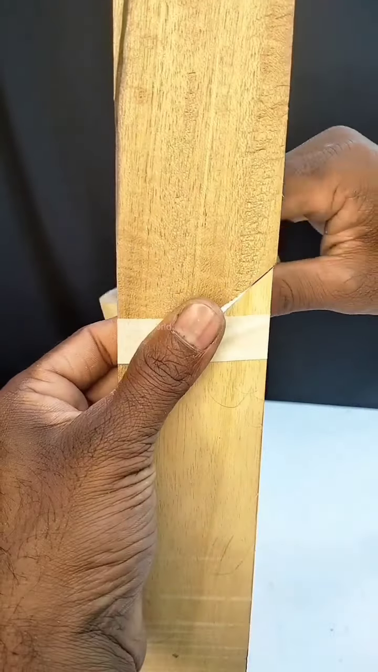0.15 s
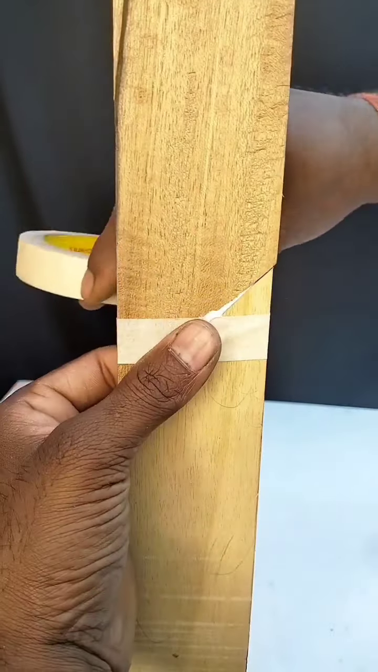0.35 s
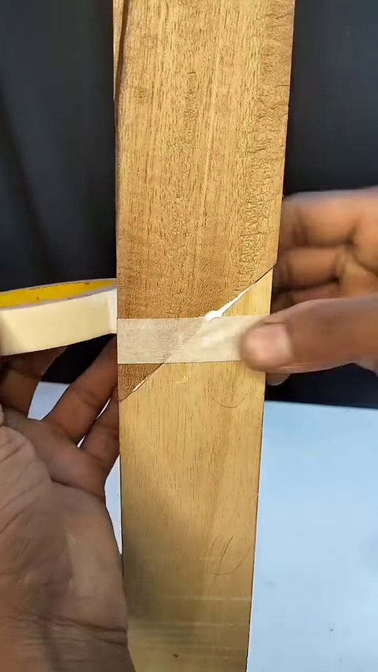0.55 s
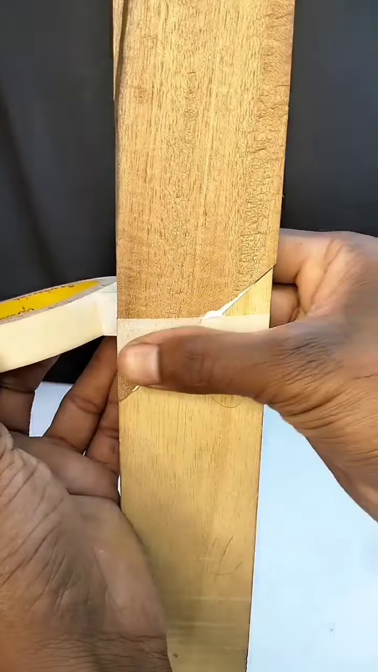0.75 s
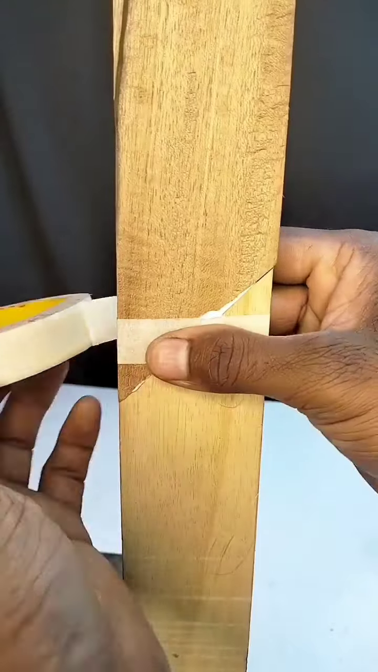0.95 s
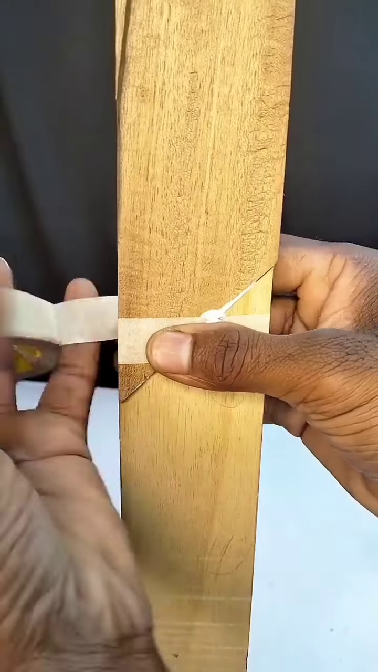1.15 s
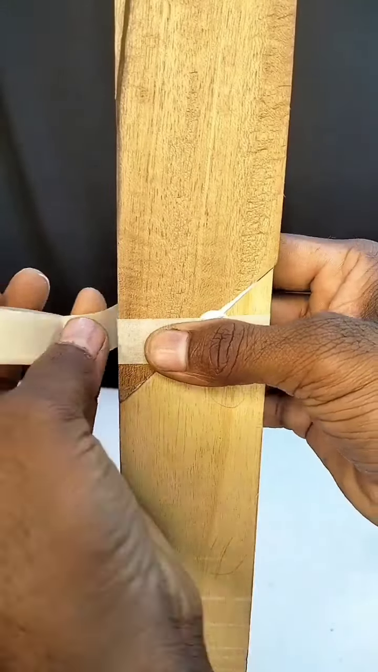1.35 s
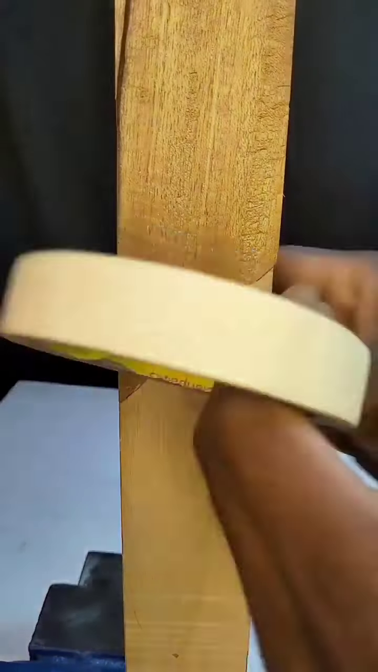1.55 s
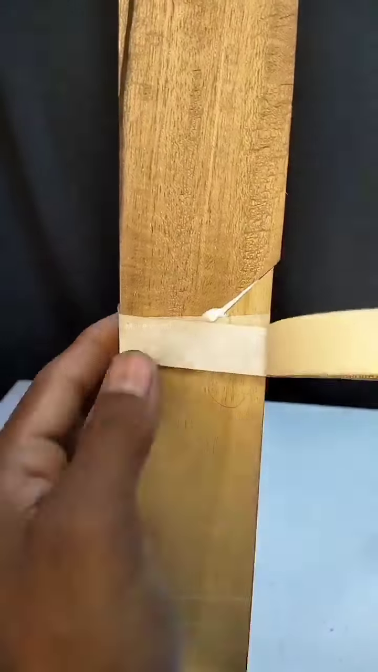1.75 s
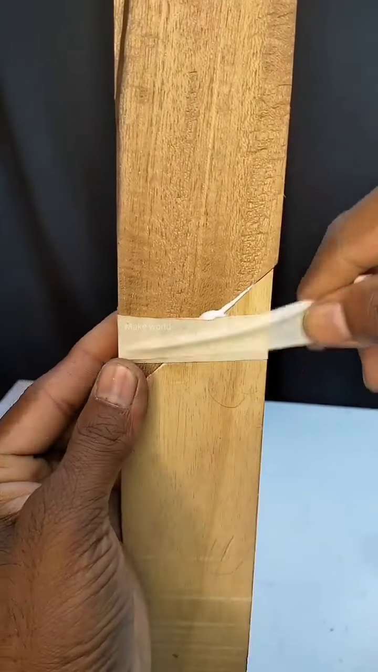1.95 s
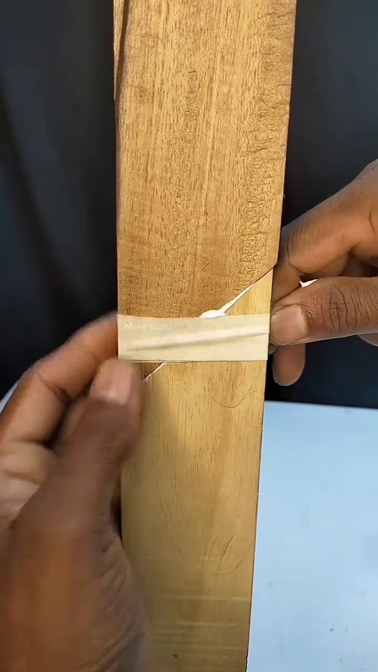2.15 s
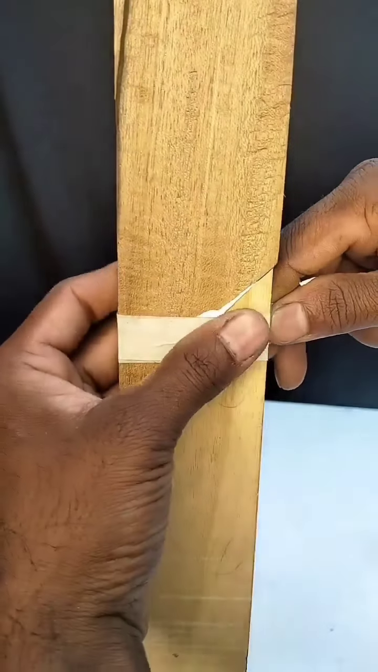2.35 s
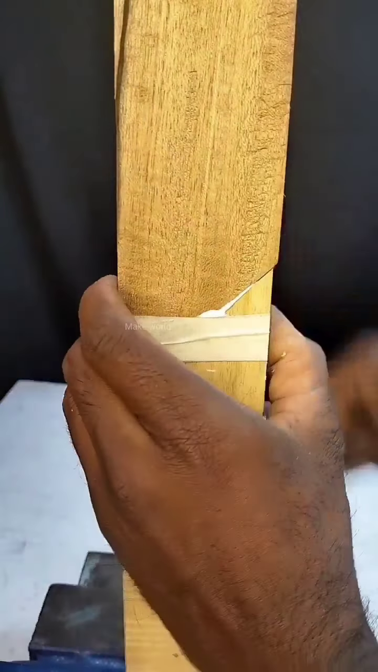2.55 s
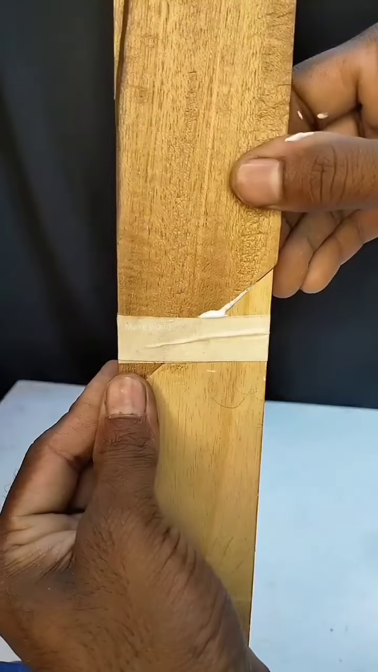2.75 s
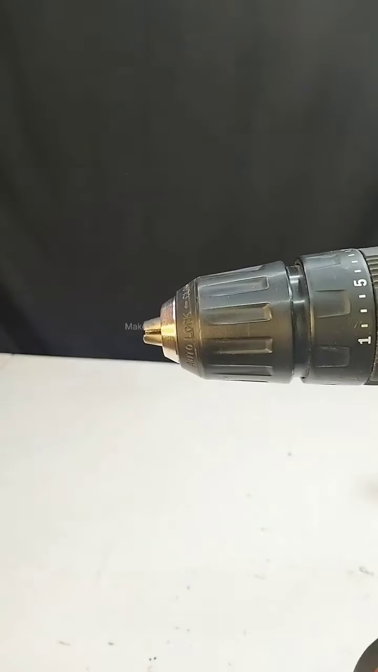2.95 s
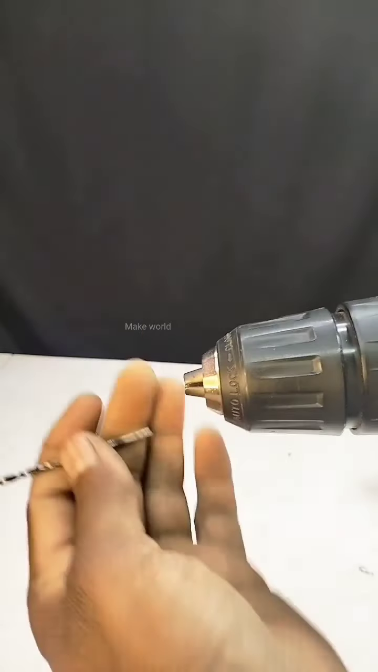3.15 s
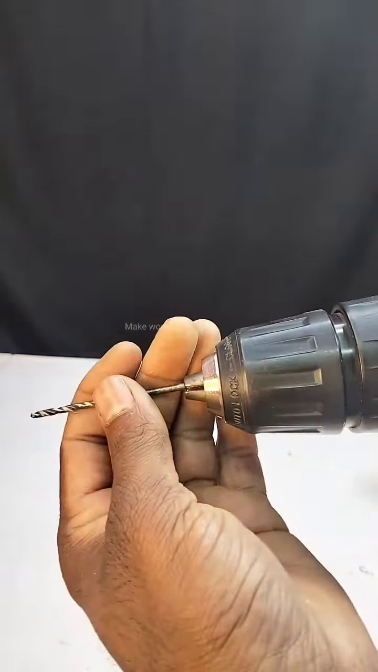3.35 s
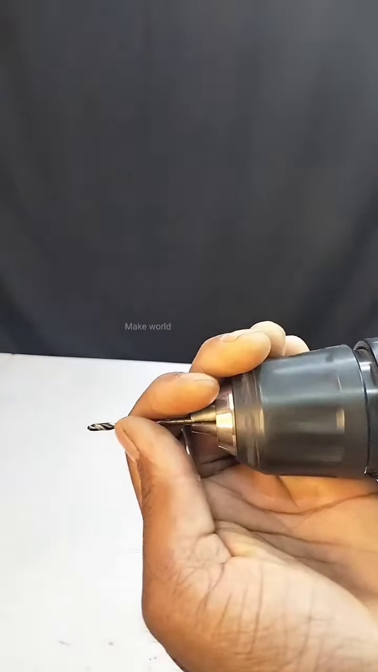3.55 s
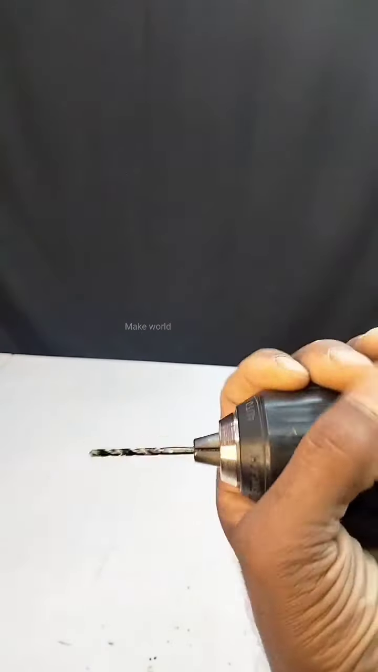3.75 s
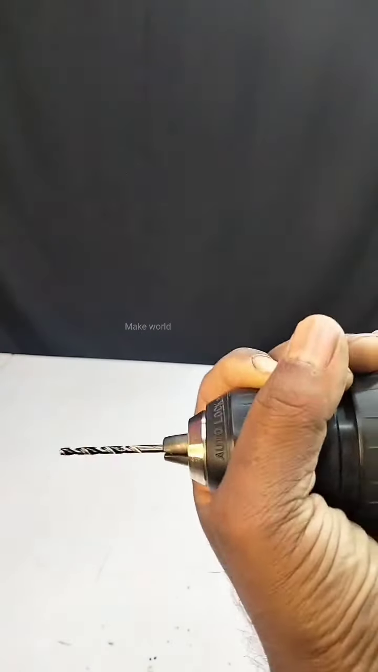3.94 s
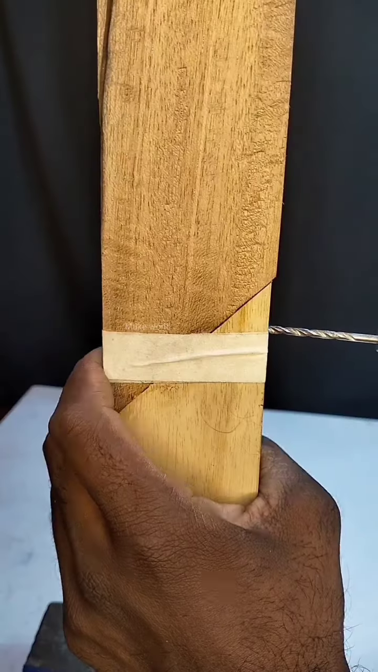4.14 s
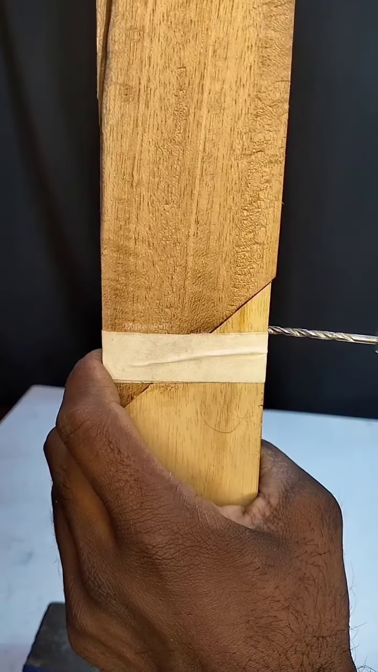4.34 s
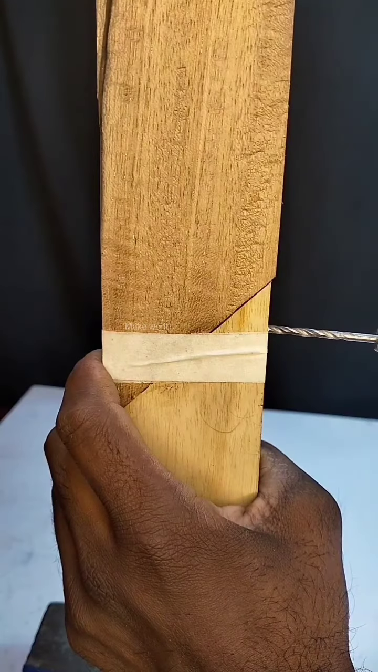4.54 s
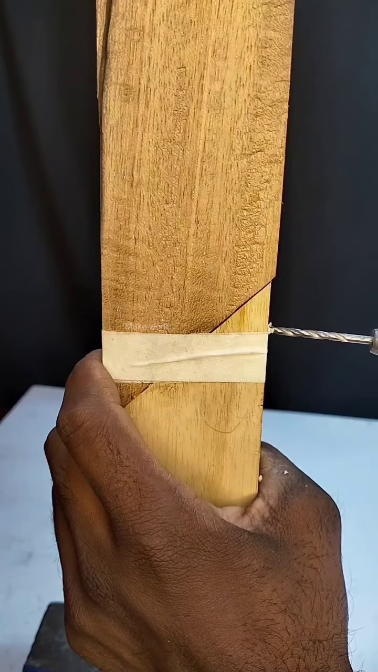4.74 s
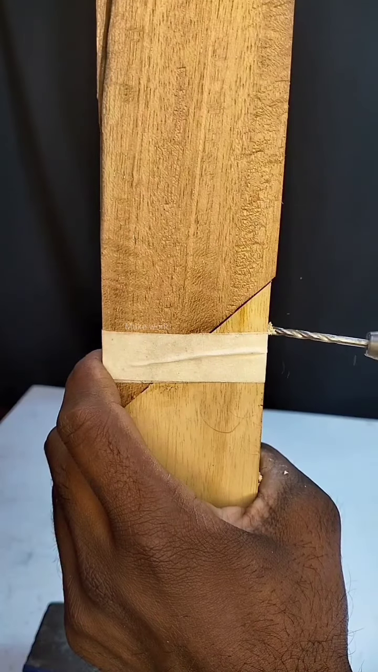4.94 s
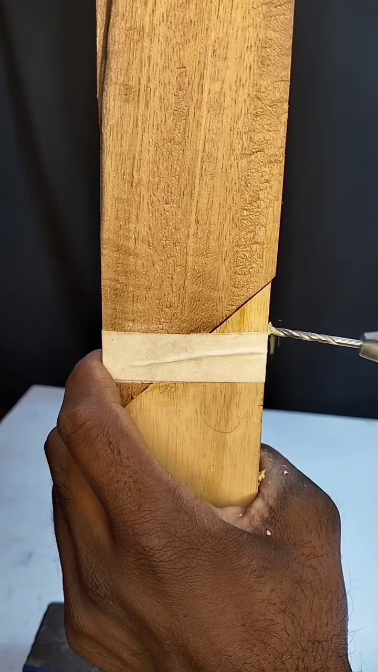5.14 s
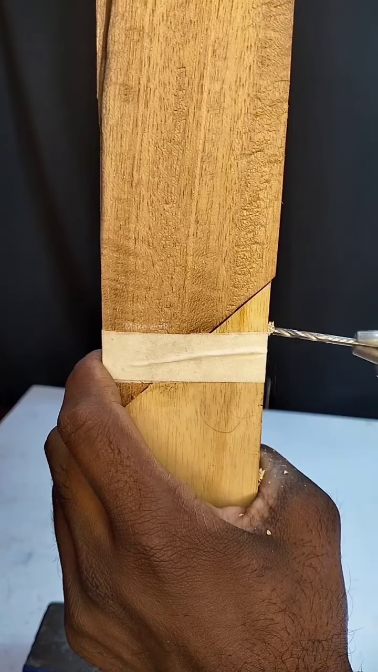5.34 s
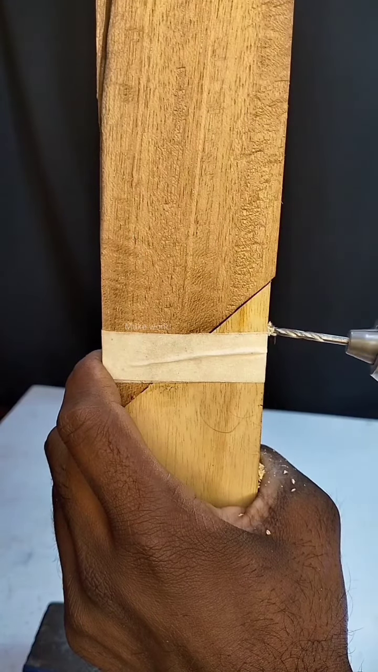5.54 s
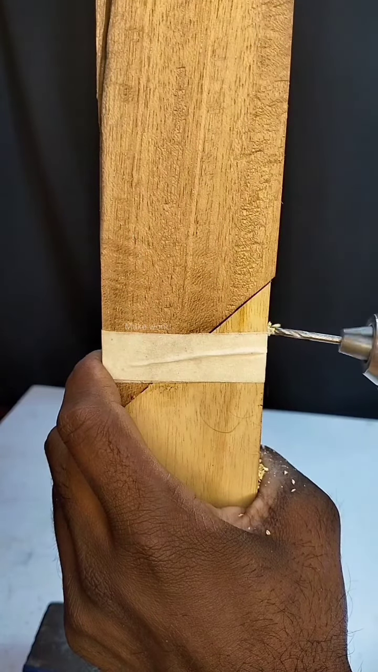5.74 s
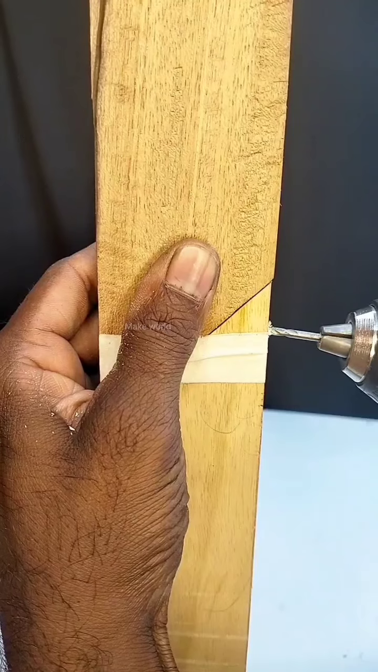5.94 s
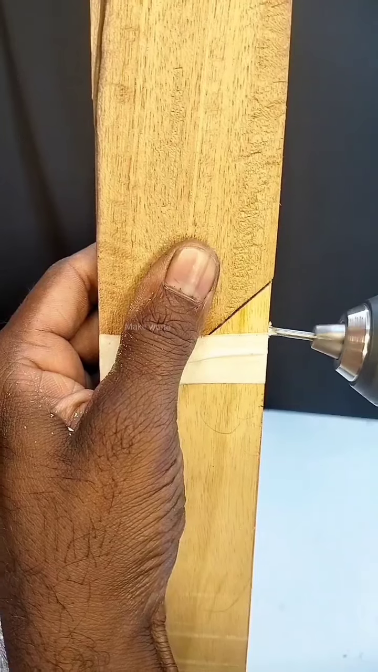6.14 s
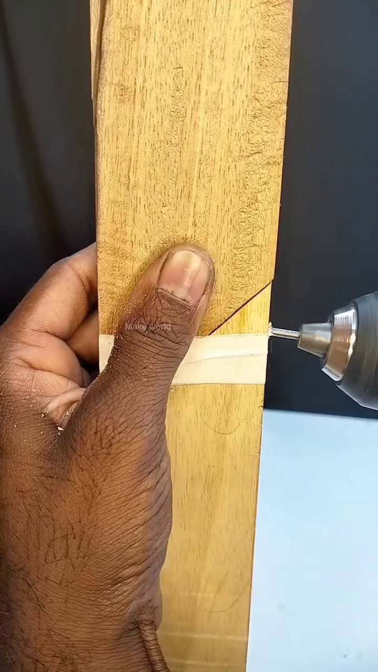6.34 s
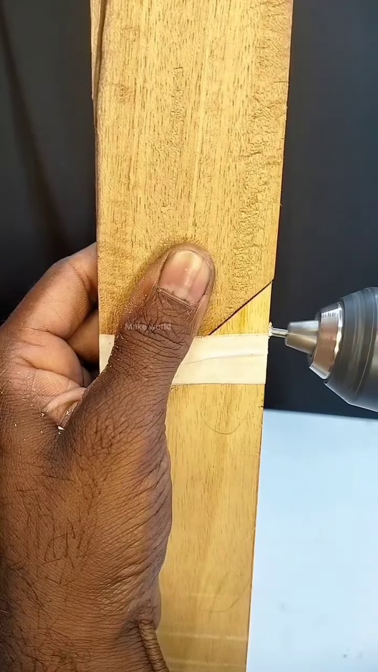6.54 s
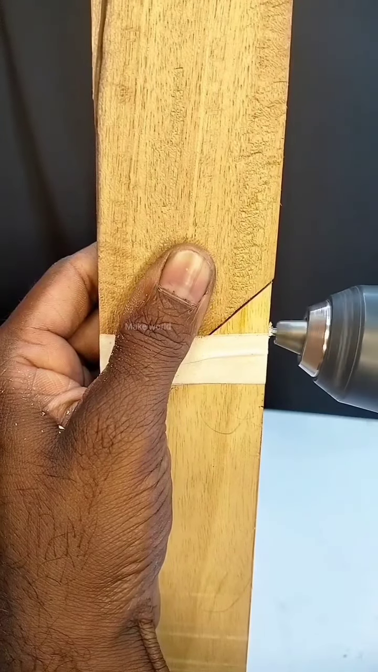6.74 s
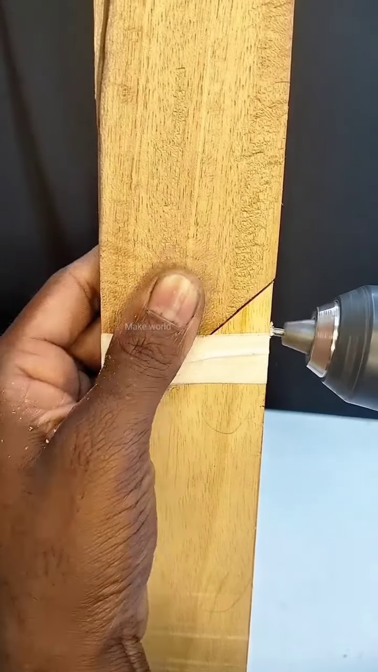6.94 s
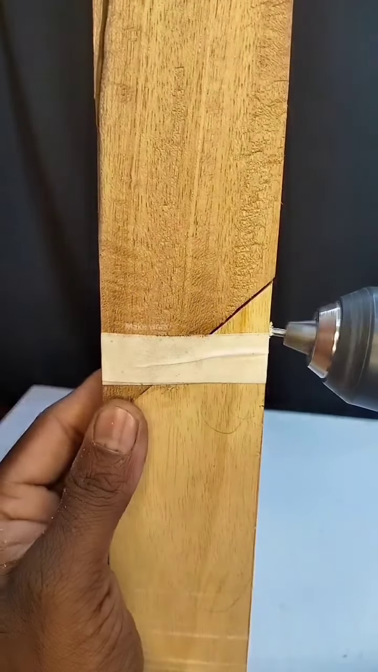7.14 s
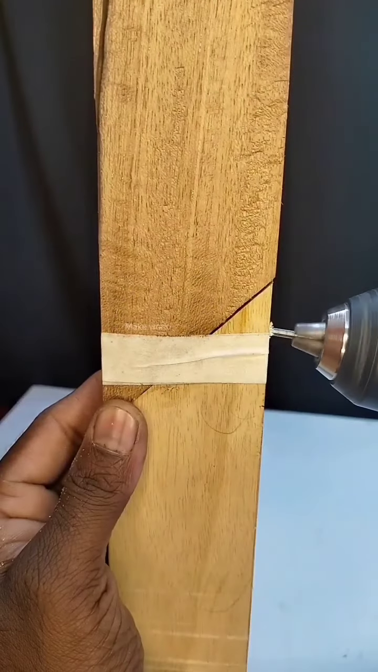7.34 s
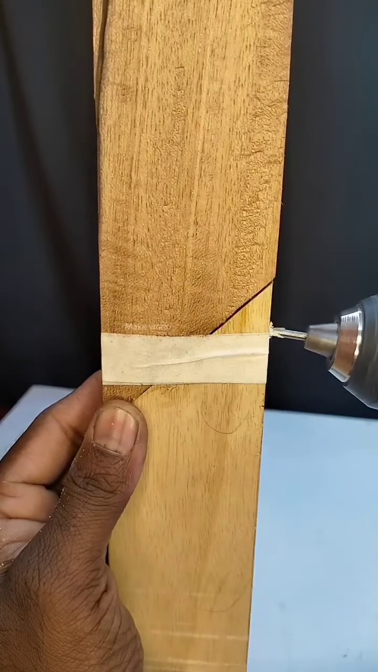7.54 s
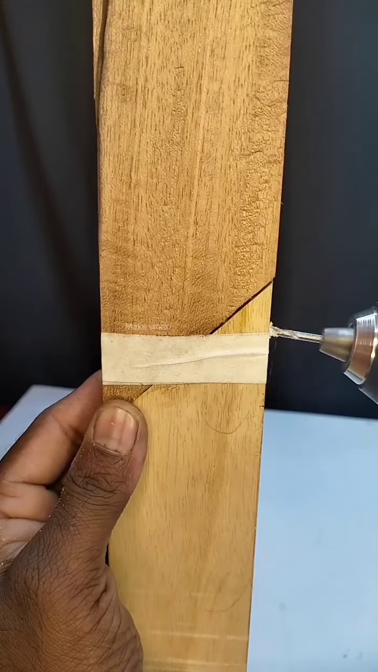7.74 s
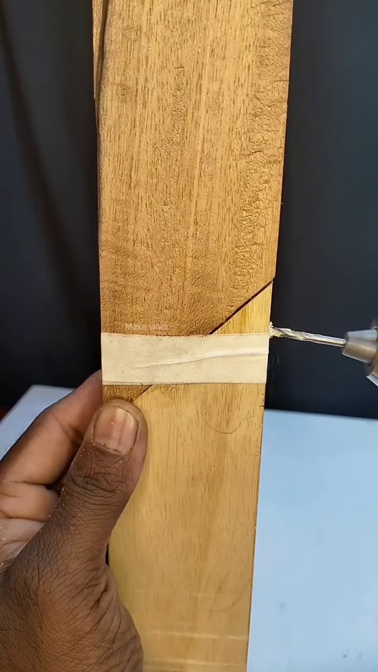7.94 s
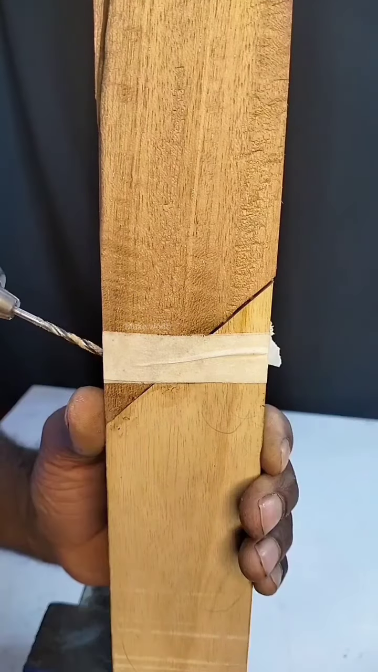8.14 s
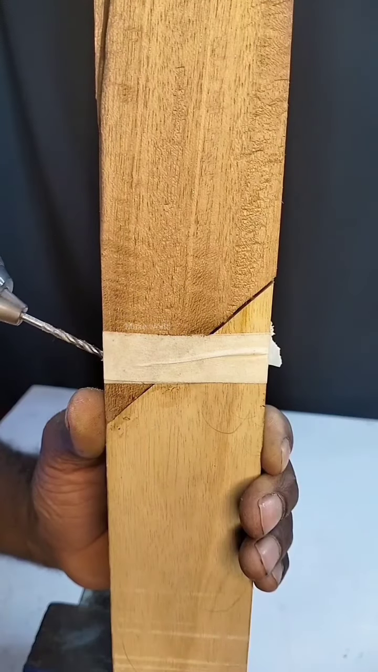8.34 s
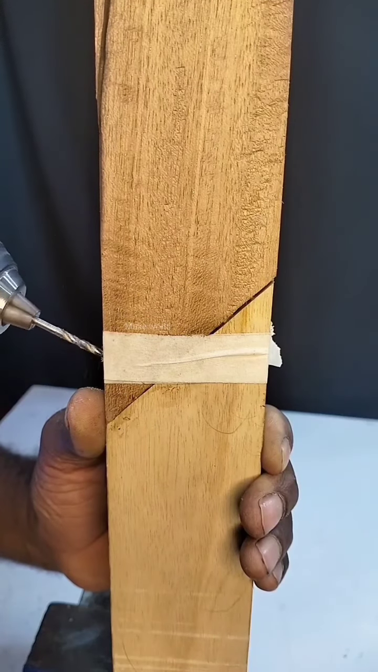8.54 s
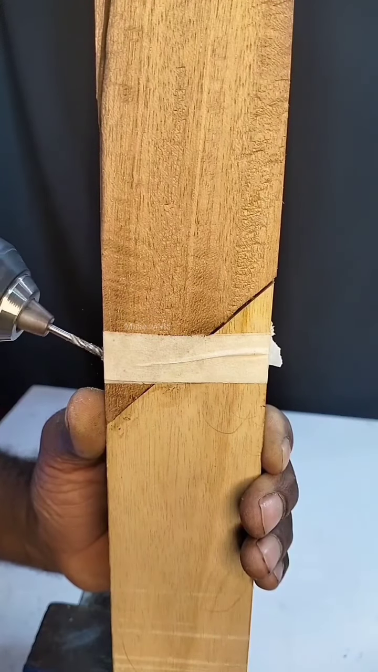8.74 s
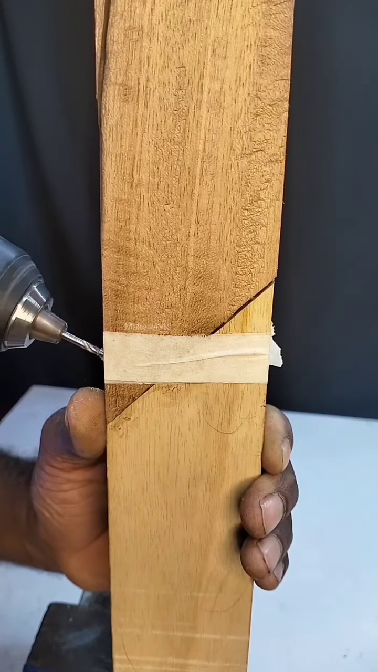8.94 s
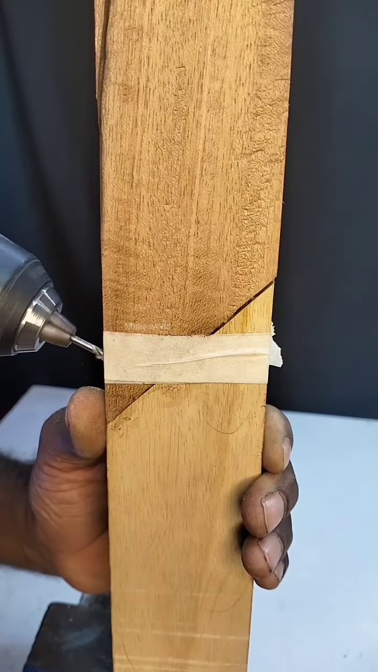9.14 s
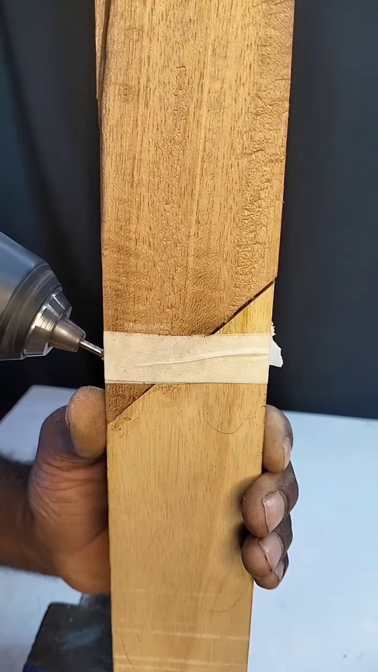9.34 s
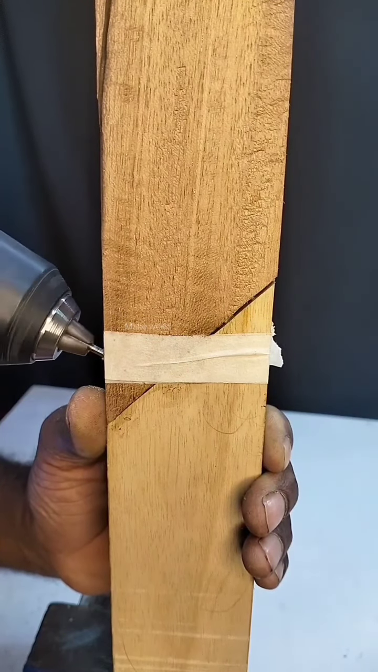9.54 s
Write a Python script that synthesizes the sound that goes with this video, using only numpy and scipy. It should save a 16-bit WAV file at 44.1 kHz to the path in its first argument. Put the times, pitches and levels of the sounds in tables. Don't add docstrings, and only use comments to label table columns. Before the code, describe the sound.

Quiet taping with a knock and a rip, steel clacks of a drill chuck tightening, then three close bursts of cordless drilling into a plank.

```python
import sys
import numpy as np
from scipy import signal
from scipy.io import wavfile
from scipy.ndimage import uniform_filter1d, minimum_filter1d

SR = 44100
rng = np.random.default_rng(int(sys.argv[2]) if len(sys.argv) > 2 else 0)


def to_wav(s):
    ch = np.atleast_2d(s).T
    pcm = np.round(np.clip(ch, -1, 1) * 32767)
    wavfile.write(sys.argv[1], SR, pcm.astype(np.int16))


def invert_db(x):
    u = np.asarray(x, float) / 20
    return 10 ** u


N = 422919
EDGE_HZ = 15550

# three of handwork, then three drill runs [s].
SHOT_EDGES = [0, 3.05, 3.572, 4.24, 5.935, 8.187, 9.6]
# frequency in Hz, left minus right in dB.
LEAN = [
    [(60, 2), (240, 2), (950, 2), (3770, -3), (15000, 0)],
    [(60, 6), (240, -1), (950, 1.5), (3770, -5.5), (15000, 2)],
    [(60, -3), (240, 3), (950, 1), (3770, -1), (15000, 1.5)],
    [(60, -7), (240, 12), (950, -2), (3770, 0.5), (15000, 2)],
]
# multiple of shaft speed, level in dB above gear noise.
HALF_SPEED = [(10, -8), (20, -12), (30, -4), (42, -11)]
LIGHT_CUT = [(10, -13), (14, -19), (20, -15.5), (23.3, -26), (30, -4), (40, -13)]
BITING = [(1.45, -20), (2, -13), (10, -13), (16, -17)]
DEEP_CUT = [(1.45, -19.5), (2, -24), (4, -14.5), (8, -17.5), (10, -12.5), (18, -17)]
BINDING = [(2, -19.5), (4, -13), (16, -17), (18, -18), (20, -8.5), (28, -12)]
BOTTOMED = [(2, -10), (3, -25.5), (4, -13.5), (10, -20), (14, -18.5), (20, -8.5), (22, -13.5)]
BRAKING = [(2, -19), (4, -13), (10, -20), (20, -16), (30, -9)]
SKATING = [(2, -20), (4, -18.5), (10, -9), (20, -25), (23.3, -21)]
CATCHING = [(2, -43), (4, -15.5), (10, -8), (20, -18)]
STEADY_CUT = [(2, -17.5), (4, -22.5), (10, -9), (22, -21), (26, -24)]


def evened(x):
    return x / np.sqrt(np.mean(x ** 2) + 1e-20)


def read(points, hz):
    f, value = np.transpose(points)
    return np.interp(np.log(hz + 1), np.log(f + 1), value)


def along(rows, t):
    s, *columns = np.transpose(rows)
    return [np.interp(t, s, c) for c in columns]


def add(mix, s, sound):
    part = mix[:, round(s * SR):][:, :sound.shape[1]]
    part += sound[:, :part.shape[1]]


def wander(count, rate_hz):
    steps = int(count * 2 * rate_hz / SR) + 3
    corners = rng.standard_normal(steps)
    return np.interp(np.linspace(0, steps - 1, count), np.arange(steps), corners) * 0.35


def ports(hz, lean):
    # frequency in Hz, radians by which the left leads.
    left_lead = [(3300, 0.05), (4600, 0.64), (8900, 0.95), (10000, 1.18), (12000, 2.06)]
    left = invert_db(read(lean, hz) / 2) * np.exp(.5j * read(left_lead, hz))
    return left, 1 / left


def noise(count, tone, lean, patchy_db, flicker_db, streaky_db, alike=None):
    # frequency in Hz, likeness from 0 to 1.
    usual_likeness = [(60, 0.11), (150, 0.3), (380, 0.56), (950, 0.78), (2380, 0.77), (4400, 0.37),
                      (8000, 0.2), (15000, 0.21)]
    frames, hz = count // 128 + 5, np.fft.rfftfreq(512, 1 / SR)
    a, b, c, d, patches, streaks = rng.standard_normal((frames, 257, 6)).T
    streaks = evened(uniform_filter1d(streaks, size=110, axis=1))
    patches = uniform_filter1d(patches, size=5, axis=0)
    patches = evened(uniform_filter1d(patches, size=18, axis=1))
    flicker = evened(uniform_filter1d(rng.standard_normal(frames), size=5))
    same = np.clip(read(usual_likeness if alike is None else alike, hz), 0, 1)[:, None]
    first, other = a + 1j * b, c + 1j * d
    z = np.array([first, same * first + np.sqrt(1 - same ** 2) * other])
    z *= np.array(ports(hz, lean))[:, :, None]
    z *= invert_db(read(tone, hz)[:, None] + patchy_db * patches + streaky_db * streaks + flicker_db * flicker)
    x = signal.istft(z, nperseg=512, noverlap=384)[1][:, :count]
    return x / np.std(x.mean(0))


def hits(events, tone, t60, longer, snap=0, rise_s=0.00092):
    out, t, hz = np.zeros((2, N)), np.arange(4096) / SR, np.fft.fftfreq(4096, 1 / SR)
    rattles = rng.standard_normal((len(events), 3, 4096))
    for row, r in zip(events, rattles):
        s, db, pan_db, rattle_db, tilt_db = (*row, *(0, -12, 0)[len(row) - 2:])
        colour_db = read(tone, abs(hz)) + tilt_db * np.log2((abs(hz) + 500) / 4000)
        colour = np.maximum(colour_db, -100) * np.log(10) / 20
        causal = np.exp(colour - 1j * signal.hilbert(colour).imag)
        fall = invert_db(-60 * t / t60) + invert_db(rattle_db - 60 * t / (longer * t60))
        rise = np.minimum(t / rise_s + 0.086, 1) ** 2
        drive = (0.49 * r[0] + .5 * r[1:]) * fall * rise
        drive[:, 50] += snap
        sound = np.fft.ifft(np.fft.fft(drive) * causal).real
        pan = invert_db(np.array([[.5], [-.5]]) * pan_db)
        add(out, s, invert_db(db) * sound / abs(sound.mean(0)).max() * pan)
    return out


def drill(run, t):
    # time in seconds, gear noise in dB at the reference speed.
    pressure = [
        [(4.27, -48.5), (4.33, -39), (4.44, -38), (4.5, -39.5), (5.82, -37)],
        [(6.03, -38.5), (6.2, -37), (6.62, -36.5), (6.66, -38), (7.34, -40.5), (7.9, -41)],
        [(8.31, -40), (8.67, -43), (9.59, -40.5)],
    ]
    # dB above gear noise at the start of a run, and at its end.
    depth = [(-15.5, -8), (-6.5, -8), (-17.5, -8.5)]
    # frequency in Hz, level in dB per Hz.
    gears = [
        [(1350, -36), (2300, -6), (2830, -2), (3120, -6), (3370, -2.5), (4290, -4), (4790, 2), (6240, -2.5),
         (9230, 2), (10200, 0), (11100, -3), (12100, -0.5), (15500, -0.5)],
        [(1350, -57), (2300, -11.5), (2830, -5.5), (4390, -4.5), (4760, -2), (5360, -4.5), (6980, -7),
         (9230, -3), (10900, -6.5), (14300, -4.5), (15500, -8.5)],
        [(1350, -35), (2000, -18), (2300, -8), (3220, -5.5), (3460, -7.5), (5280, -4), (6340, -6.5), (8050, 1),
         (9450, -8), (11400, -1.5), (14800, -7), (15500, 1)],
    ]
    # frequency in Hz, level in dB per Hz.
    plank = [
        [(18, -63), (30, -44), (322, -20), (396, -23), (460, -17.5), (709, -20), (941, -9.5), (1590, -8.5),
         (1920, -2.5), (2280, -12), (2700, -35), (3510, -59), (5940, -120)],
        [(18, -60), (30, -52), (102, -41), (250, -25.5), (451, -18), (600, -22), (923, -5), (1200, -6.5),
         (1650, -4), (1890, 3), (2150, -1.5), (2700, -5), (3510, -23), (5940, -120)],
        [(18, -56), (30, -32), (193, -37), (340, -20), (670, -7.5), (856, -10.5), (1090, -0.5), (1420, -10),
         (1880, -4.5), (1990, -14), (2100, 1), (2700, -4), (3510, -3), (5940, -120)],
    ]
    reference_hz, bite_hz, bite_db = 400, 312, 30
    lean, speed = LEAN[run + 1], shaft(run, t)
    plank_db = np.linspace(*depth[run], len(t))
    gear_db = along(pressure[run], t)[0] + 20 * np.log10(speed / reference_hz)
    turns = 2 * np.pi * np.cumsum(speed) / SR
    throb = 1 + 0.18 * np.cos(turns) + 0.053 * np.cos(turns / 26 + wander(len(t), rate_hz=2.6))
    chips = invert_db(1.1 * wander(len(t), rate_hz=900))
    hiss = noise(len(t), gears[run], lean, patchy_db=1.0, flicker_db=0.0, streaky_db=1.5)
    hiss = hiss * evened(throb * chips)
    rumble = noise(len(t), plank[run], lean, patchy_db=0.0, flicker_db=1.3, streaky_db=3.5)
    rumble = rumble * invert_db(bite_db * np.log10(np.clip(speed / bite_hz, .45, 1)))
    body = invert_db(-0.26) * hiss + invert_db(plank_db - 3.0) * rumble
    return invert_db(gear_db) * (body + whine(run, t, speed) + rings(run, t))


def shaft(run, t):
    # time in seconds, new shaft speed in Hz, lag in seconds.
    speed_steps = [
        [(4.24, 39.5, 1), (4.262, 164.7, 0.012), (4.33, 169.3, 0.051), (4.366, 327.5, 0.017), (4.4, 334.4, .06),
         (4.75, 329.4, 0.19), (5.4, 314, 0.61)],
        [(5.935, 585, 1), (5.95, 648, .03), (6.1, 574, .042), (6.565, 521, .035), (6.72, 529, .12),
         (6.865, 462.5, .05), (7.55, 480, .55)],
        [(8.185, 554, 0.81), (8.25, 538.6, 0.28), (8.53, 519, 0.077), (8.75, 511.5, 0.15), (9.05, 520, 0.15),
         (9.3, 498.6, 0.42)],
    ]
    release_s, grip_s, brake_hz_per_s, idle_hz = 7.91, .014, 2250, 20
    steps = speed_steps[run]
    speed = np.full(len(t), float(steps[0][1]))
    for before, (s, hz, lag) in zip(steps, steps[1:]):
        speed += (hz - before[1]) * (1 - np.exp(-np.maximum(t - s, 0) / lag))
    braked = grip_s * np.logaddexp(0, (t - release_s) / grip_s) * (t[0] < release_s)
    return np.maximum(speed - brake_hz_per_s * braked, idle_hz)


def whine(run, t, speed):
    # start in seconds, tones of the state as listed above.
    motor_stages = [
        [(4.287, HALF_SPEED), (4.368, [(10, -19), (30, -4)]), (4.398, LIGHT_CUT)],
        [(5.96, BITING), (6.14, DEEP_CUT), (6.58, BINDING + [(1.5, -21)]), (6.64, BINDING),
         (6.9, BOTTOMED + [(1, -28)]), (6.96, BOTTOMED + [(1, -16)]), (7.6, BOTTOMED + [(1, -16), (4, -18),
         (30, -6)]), (7.79, BOTTOMED + [(1, -23), (4, -18), (30, -6)]), (7.87, BRAKING), (7.974, [(10, -17),
         (30, 6)]), (7.992, []), (8.025, [(10, -12), (20, -7), (30, -8), (46, -11)]), (8.085, [])],
        [(8.186, SKATING), (8.5, CATCHING), (8.66, STEADY_CUT), (9.2, STEADY_CUT + [(6, -22)])],
    ]
    stages, lean = motor_stages[run], LEAN[run + 1]
    turns, out = 2 * np.pi * np.cumsum(speed) / SR, np.zeros((2, len(t)))
    phases = 2 * np.pi * rng.random(64)
    ends = [s for s, _ in stages[1:]] + [t[-1] + 1]
    for (start, orders), end in zip(stages, ends):
        on = (t > start - .03) & (t < end + .03)
        blend = np.clip(np.minimum(t[on] - start, end - t[on]) / .045 + .5, 0, 1)
        for k, db in orders:
            waver = invert_db(db + min(k / 2 + 1, 2.6) * wander(on.sum(), rate_hz=25))
            waver = waver * (k * speed[on] < EDGE_HZ)
            slack = .009 * k * wander(on.sum(), rate_hz=30)
            tone = np.exp(1j * (k * turns[on] + slack + phases[round(k)]))
            gains = np.array(ports(k * speed[on].mean(), lean))[:, None]
            out[:, on] += np.sqrt(2) * blend * waver * (gains * tone).real
    return out


def rings(run, t):
    # start and end in seconds, first and last frequency in Hz,
    # width in Hz, level in dB above gear noise.
    resonances = [
        [(4.255, 5.7, 1930, 1960, 75, -16), (4.25, 4.3, 1900, 1950, 130, -4.5),
         (4.355, 4.39, 1930, 1950, 60, -1.5), (4.37, 4.42, 450, 500, 51, -19),
         (4.445, 4.49, 1950, 1950, 50, -11), (5.2, 4.5, 4400, 5150, 80, -14)],
        [(5.95, 6.5, 1920, 1886, 119, -22), (5.99, 6.13, 1880, 1900, 60, -14),
         (6.0, 6.12, 4720, 4730, 150, -11), (6.35, 6.62, 1549, 1540, 150, -17),
         (6.66, 7.4, 1542, 1520, 35, -18.5), (7.98, 8.035, 1970, 1960, 120, -10),
         (8.06, 8.095, 2046, 1910, 150, 1.5)],
        [(9.24, 11, 3250, 2900, 52, -22), (8.7, 11, 4300, 3480, 57, -17), (8.7, 9.62, 500, 490, 12, -34.5),
         (8.8, 9.62, 740, 730, 24, -30.5), (9.05, 9.62, 975, 985, 17.3, -20.5),
         (8.6, 9.62, 1240, 1230, 43, -25), (8.9, 9.62, 1550, 1400, 24, -25)],
    ]
    out = np.zeros((2, len(t)))
    for start, end, from_hz, to_hz, width, db in resonances[run]:
        on = (t > start) & (t < end)
        u = (t[on] - start) / (end - start)
        hz = from_hz + (to_hz - from_hz) * u
        r = np.exp(-np.pi * width / SR)
        drive = rng.standard_normal(len(u)) + 1j * rng.standard_normal(len(u))
        slow = signal.lfilter([1 - r], [1, -r], drive)
        tone = slow / np.std(slow) * np.exp(2j * np.pi * np.cumsum(hz) / SR)
        fade = np.clip(np.minimum(t[on] - start, end - t[on]) / .02, 0, 1)
        gains = np.array(ports(hz.mean(), LEAN[run + 1]))[:, None]
        out[:, on] += np.sqrt(2) * invert_db(db) * fade * (gains * tone).real
    return out


def plank_thumps():
    # start in seconds, peak in dB.
    jolts = [(6.095, -48.5), (6.755, -54), (6.79, -54)]
    # frequency in Hz, level in dB.
    thump_tone = [(100, -35), (200, -10), (320, 1), (480, -4), (800, -31), (3000, -70)]
    return hits(jolts, thump_tone, t60=0.069, longer=1.3, rise_s=0.0042)


def chuck_ratchet():
    # start in seconds, peak in dB, left minus right in dB, rattle in dB, brightness in dB per octave.
    clacks = [(3.695, -37, 3, 6, 5), (3.702, -35, 0.5, -2, 1), (3.7727, -17.5, 7, -11, 1),
              (3.837, -16, 7, -32, 1), (3.846, -36, 8, -3, -4), (3.883, -13.5, -3, -17.5, 0),
              (3.938, -18.5, -4, -20, 1.5), (3.947, -33.5, -5, -4.5, -2), (3.9945, -19.5, 3, -12, -1),
              (3.9985, -35, -9, -17, -6)]
    # frequency in Hz, level in dB.
    ratchet_tone = [(120, -49), (200, -13.5), (1470, -8), (3260, -9), (4070, -5), (5300, 1), (6800, -1),
                    (8070, -8), (14900, -6.5), (16600, -31)]
    return hits(clacks, ratchet_tone, t60=0.0062, longer=5.2, snap=2.45)


def pings():
    # start in seconds, peak in dB, frequency in Hz.
    steel_pings = [(3.1855, -46, 5200), (3.1615, -55, 2900), (3.3605, -53, 7500), (3.7737, -23, 5700),
                   (3.838, -28, 5370), (3.8838, -27, 5600), (3.9384, -22, 5350), (3.9955, -18.5, 5000),
                   (3.997, -30, 5000), (3.9991, -40, 5900)]
    rise_s, t60_s = 0.00031, 0.0022
    out, t = np.zeros((2, N)), np.arange(600) / SR
    for s, db, hz in steel_pings:
        swell = np.minimum(t / rise_s, 1) * invert_db(db - 60 * np.maximum(t - 2 * rise_s, 0) / t60_s)
        add(out, s, swell * np.sin(2 * np.pi * hz * t) * np.ones((2, 1)))
    return out


def bit_in_jaws():
    # start in seconds, peak in dB, left minus right in dB, rattle in dB, brightness in dB per octave.
    ticks = [(1.1807, -49, -1.0, -12, 2), (1.2705, -39.5, -0.5, -12, 2), (1.9865, -35, -3, -14, 5),
             (3.1208, -54, 1, -11, -9), (3.1358, -47.5, 6, -4, -6), (3.1602, -51, 1, -12, -8),
             (3.1842, -49, 3, -3, -5.5), (3.227, -63, 2, -12, -2), (3.3084, -44, 2, -3, 6),
             (3.3592, -55, 1, -12, -7), (3.4353, -34, 3, -20, -6), (3.4483, -30.5, -1, -26, 0),
             (3.495, -62, 0, -12, 0), (3.5992, -59, -2, -12, 0), (3.6326, -49, 1, -12, 3),
             (3.722, -44, -1.0, -12, -2)]
    # start in seconds, peak in dB.
    shank_slides = [(3.112, -61), (3.245, -53), (3.262, -55), (3.28, -66), (3.298, -50), (3.385, -53),
                    (3.405, -54), (3.42, -57)]
    # frequency in Hz, level in dB.
    bit_tone = [(290, -43), (500, -25), (2510, -15), (3030, -11), (4780, 3), (9510, 7.5), (13700, 1),
                (16600, -18)]
    ticking = hits(ticks, bit_tone, t60=0.012, longer=2.9, snap=0.94)
    return ticking + hits(shank_slides, bit_tone, t60=0.043, longer=1.2, rise_s=0.01)


def squeaks():
    # start in seconds, first frequency in Hz.
    grips = [(3.355, 2350), (3.357, 3200), (3.4, 3450)]
    length_s, rise_ratio, level_db = .028, 1.35, -67
    out, u = np.zeros((2, N)), np.arange(0, length_s, 1 / SR) / length_s
    for s, hz in grips:
        slips = np.cumsum(hz * rise_ratio ** u * (1 + .06 * wander(len(u), rate_hz=500))) / SR
        add(out, s, invert_db(level_db) * np.sin(np.pi * u) * np.sin(2 * np.pi * slips) * np.ones((2, 1)))
    return out


def tape():
    # start in seconds, peak in dB, left minus right in dB, rattle in dB, brightness in dB per octave.
    tears = [(2.523, -41, -3, -12, 8), (2.5955, -33, 2, 0, -4), (2.608, -30, -2, 4, -2.5),
             (2.624, -29, 5, -16, -3), (2.6365, -20.5, -3, -26, 2), (2.639, -32, -1, -20, 1),
             (2.644, -31, 4, -24, -3), (2.648, -30.5, -2, -25, -2.5), (2.66, -50, 1, -22, -10)]
    # start in seconds, peak in dB.
    scrapes = [(1.6494, -49), (2.2109, -63), (2.2694, -54.5), (3.2475, -69), (3.3987, -62), (3.702, -41)]
    # frequency in Hz, level in dB.
    tape_tone = [(180, -52), (300, -21), (511, -20), (800, -8), (1100, -18), (1690, 0.5), (4230, -5),
                 (5700, -1.5), (13100, -6), (15300, -10), (16000, -53)]
    tearing = hits(tears, tape_tone, t60=0.017, longer=4.6, snap=0.81)
    return tearing + hits(scrapes, tape_tone, t60=0.12, longer=1.2) * invert_db(2.0)


def wood_knock():
    # start in seconds, peak in dB, left minus right in dB, rattle in dB.
    knocks = [(2.505, -32.5, 1.5, -14)]
    # frequency in Hz, level in dB.
    knock_tone = [(200, -33), (700, -2), (1200, 7.5), (2000, 0), (2600, -14), (3200, -25), (8000, -7.5),
                  (15000, -30)]
    return hits(knocks, knock_tone, t60=0.01, longer=7.7, snap=1.6)


def hand_pats():
    # start in seconds, peak in dB.
    pats = [(0.072, -58), (0.313, -52.5), (1.549, -52), (1.6, -55.5), (1.659, -54), (1.689, -53.5),
            (1.824, -53), (2.038, -54), (2.404, -56)]
    # frequency in Hz, level in dB.
    pat_tone = [(59, -33), (100, -38), (370, 5), (683, 1), (1080, -6), (1170, -9.5), (3000, -6),
                (3900, -63), (6600, -120)]
    return hits(pats, pat_tone, t60=0.12, longer=1.7)


def surroundings(shot, t):
    # time in seconds, hiss in dB, rustle in dB above the hiss.
    quiet = [
        [(0.1, -56.5, -12.5), (2.9, -58.5, -11.5)],
        [(3.13, -74, 3), (3.4, -67.5, -5)],
        [(3.8, -59, -10.5), (4.15, -60.5, -7)],
    ]
    # frequency in Hz, level in dB per Hz.
    air = [
        [(1760, -46), (3000, -18), (3350, -33), (3800, -22), (4080, -3.5), (4290, -6), (4790, -7.5), (4990, -3),
         (6300, 0), (7900, -8), (8880, -6.5), (10300, -9), (10750, -12), (11200, -9), (13100, -1.5),
         (14900, -6), (15500, -5.5)],
        [(1760, -20), (3000, -19), (4030, -4), (6480, -11), (8240, -2), (8950, 0), (9390, -11), (14500, -1),
         (15500, -26)],
        [(1760, -19), (3000, -4.5), (3950, -5.5), (4660, -8.5), (5310, -8), (6340, -15), (7740, -4.5),
         (12600, -17.5), (13000, -8), (14000, -24), (15500, -30)],
    ]
    # frequency in Hz, level in dB per Hz.
    hands = [
        [(18, -64), (30, -29), (197, -22), (261, -11.5), (332, -12.5), (414, -6.5), (785, -12.5), (1170, -19.5),
         (2560, -16.5), (3150, -16), (3750, -18.5), (4300, -44), (7920, -120)],
        [(18, -53), (30, -30), (246, -8), (431, -14), (559, -13.5), (1400, -21.5), (1620, -17), (3600, -23),
         (4680, -47), (7920, -120)],
        [(18, -57), (30, -42), (193, -1.5), (382, -8.5), (422, -29), (669, 1), (725, -23), (1320, -10),
         (3600, -9.5), (4680, -34), (7920, -120)],
    ]
    # frequency in Hz, likeness from 0 to 1.
    air_likeness = [(60, 0), (200, 0.22), (500, 0.59), (1290, 0.24), (4400, 0.46), (8000, 0),
                    (15000, 0.061)]
    hiss_db, rustle_db = along(quiet[shot], t)
    hiss = noise(len(t), air[shot], LEAN[0], patchy_db=1.2, flicker_db=1.0, streaky_db=3.5, alike=air_likeness)
    rustle = noise(len(t), hands[shot], LEAN[0], patchy_db=1.5, flicker_db=2.5, streaky_db=1.0,
                   alike=air_likeness)
    return invert_db(hiss_db) * (hiss + invert_db(rustle_db) * rustle)


def workshop_hum(t):
    # frequency in Hz, level in dB per Hz.
    hum_tone = [(20, -30), (40, -18), (150, -3.5), (350, 5), (800, -18), (1500, -10), (3000, -28)]
    # time in seconds, level in dB.
    hum_level = [(4.3, -76.5), (6.4, -78.5), (6.7, -67.5), (7.9, -70.5), (8.2, -76), (9.0, -76)]
    hum = noise(len(t), hum_tone, LEAN[0], patchy_db=2.0, flicker_db=-0.5, streaky_db=3.5)
    return invert_db(along(hum_level, t)[0]) * hum


def fades():
    # fade out in seconds, fade in in seconds, dB left at the join.
    joins = [(0.18, 0.11, -49), (0.11, 0.11, -35), (0.12, 0.015, -16), (0.13, 0.099, -27),
             (0.0078, 0.21, -44)]
    t, gain = np.arange(N) / SR, np.ones(N)
    for s, (out, back, left_db) in zip(SHOT_EDGES[1:], joins):
        gain = gain * np.interp(t, [s - out, s, s + back], [1, invert_db(left_db), 1])
    return gain


def scene():
    steady = np.zeros((2, N))
    times = [np.arange(a, b, 1 / SR) for a, b in zip(SHOT_EDGES, SHOT_EDGES[1:])]
    for run, t in enumerate(times[3:]):
        add(steady, t[0], drill(run, t))
        add(steady, t[0], workshop_hum(t))
    for shot, t in enumerate(times[:3]):
        add(steady, t[0], surroundings(shot, t))
    edge = signal.firwin(301, EDGE_HZ, window=("kaiser", 3), fs=SR)
    steady = signal.oaconvolve(steady, edge[None], "same") * fades()
    metal = chuck_ratchet() + pings() + bit_in_jaws() + squeaks()
    paper_and_wood = tape() + wood_knock() + hand_pats() + plank_thumps()
    return steady + metal + paper_and_wood


def hush_before_clicks(x, from_hz, jump_db):
    high = signal.oaconvolve(x, signal.firwin(101, from_hz, pass_zero=False, fs=SR)[None], "same")
    level_db = 10 * np.log10(abs(uniform_filter1d((high ** 2).sum(0), size=64)) + 1e-14)
    coming_db = np.roll(-minimum_filter1d(-level_db, size=350), -300)
    quiet = np.clip((coming_db - level_db - jump_db) / 3, 0, 1)
    quiet = quiet * (np.roll(coming_db, 480) < coming_db - 6)
    return x - high * uniform_filter1d(quiet, size=40)


def thin_weak_bands(x):
    hz, _, z = signal.stft(x, SR, nperseg=1024, noverlap=768)
    power = uniform_filter1d((abs(z) ** 2).sum(0), size=5, axis=1)
    band_db = 10 * np.log10(power[:512].reshape(128, 4, -1).mean(1) + 1e-20)
    drift = evened(uniform_filter1d(rng.standard_normal(band_db.shape), 2, axis=0))
    drift_db = 1.3 * drift[:, np.arange(band_db.shape[1]) // 6]
    under_db = band_db - uniform_filter1d(band_db, size=17, axis=0) + drift_db
    kept = np.clip((under_db + 5.6) / .6, invert_db(-36), 1)
    kept = kept[np.minimum(np.arange(len(hz)) // 4, 127)]
    kept[hz < 1890] = 1
    return signal.istft(z * kept, SR, nperseg=1024, noverlap=768)[1][:, :N]


def low_pass(x):
    return signal.sosfilt(signal.butter(12, 16830, fs=SR, output="sos"), x)


def record(dry):
    hushed = hush_before_clicks(dry, from_hz=9500, jump_db=14.5)
    return low_pass(thin_weak_bands(hushed))


dry = scene()
out = record(dry)
to_wav(out)
```